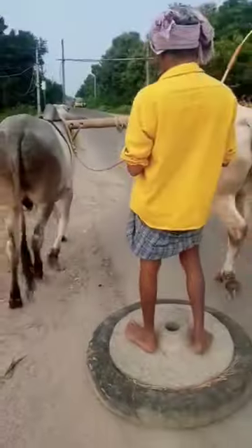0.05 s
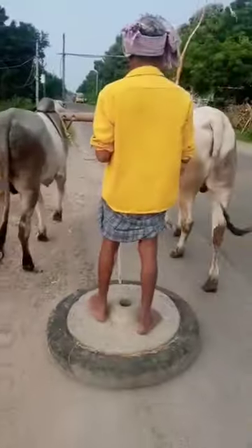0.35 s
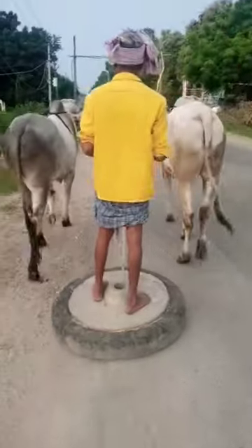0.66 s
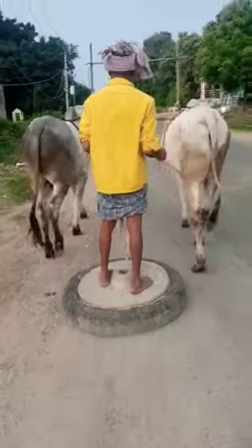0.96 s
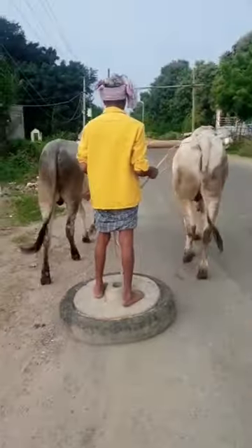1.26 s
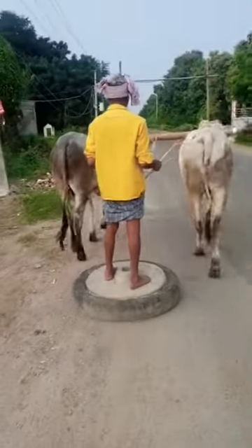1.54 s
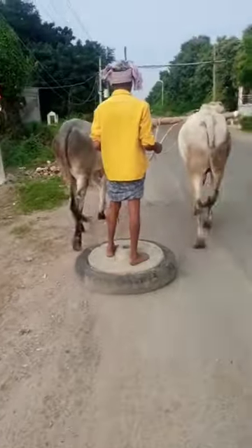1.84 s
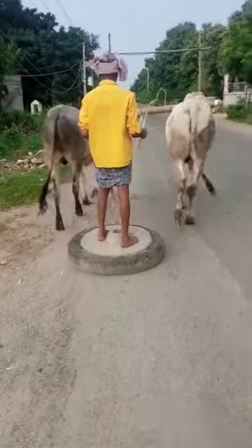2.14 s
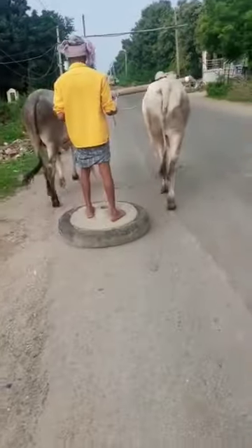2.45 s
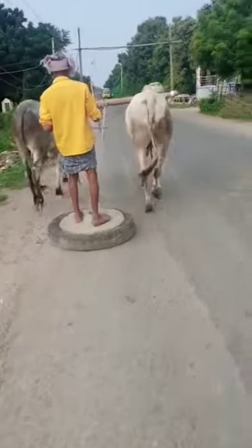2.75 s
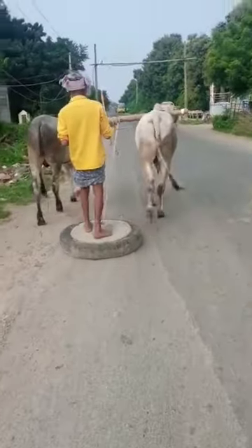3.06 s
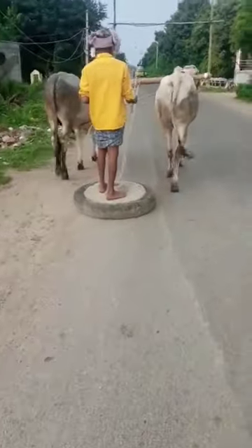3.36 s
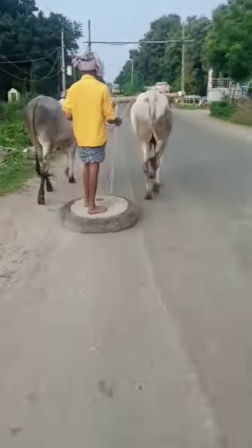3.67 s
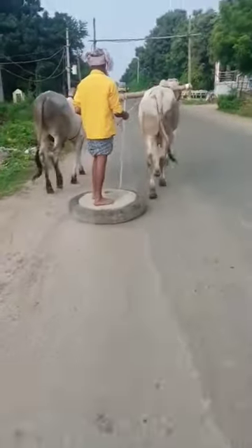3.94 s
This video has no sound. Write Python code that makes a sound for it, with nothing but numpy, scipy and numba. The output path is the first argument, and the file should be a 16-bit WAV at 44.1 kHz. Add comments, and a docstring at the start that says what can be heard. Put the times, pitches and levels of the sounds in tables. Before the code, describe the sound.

A heavy tyre scrapes and rumbles as it is dragged over a gritty road.

```python
"""A dusty verge beside an asphalt road, the microphone a few metres behind a weighted tyre that two oxen
drag, lying flat, onto the road. Bumps make the carcass rumble, the rubber rasps in quick slips, and sand
and small stones crunch and hiss under it. A short reflection that shifts with the walk colours the scrape.
Behind it are faint outdoor air and a single bird chirp."""
import sys
import numpy as np
from scipy import signal
from scipy.fft import rfft, irfft
from scipy.io import wavfile
from scipy.ndimage import uniform_filter1d, map_coordinates
from numba import njit

SR = 44100
rng = np.random.default_rng(int(sys.argv[2]) if len(sys.argv) > 2 else 0)


def unload_wav(signal):
    """Save mono or channel-first audio to the path in sys.argv[1] as 16-bit WAV at rate SR, clipped to [-1, 1]."""
    wavfile.write(
        sys.argv[1],
        SR,
        np.round(np.clip(np.atleast_2d(signal).T, -1, 1) * 32767).astype(np.int16),
    )


N = 176400

# The reflection at the moving microphone. Each row: time in seconds, lag in ms before the hand's sway.
REFLECTION_LAG = [(0, 0.64), (.7, 0.61), (.95, 0.64), (1.12, 0.79), (1.45, 0.77), (1.62, 0.89),
                  (1.85, 1.02), (2.05, 1.04), (2.25, 0.94), (2.95, 0.95), (3.12, 1.077), (3.35, 1.08),
                  (3.52, 0.9), (3.72, 1.02), (4, 1.09)]
# Its strength. Each row: time in seconds, share of the direct sound.
REFLECTION_SHARE = [(0, 0.27), (1.3, 0.36), (2.0, 0.44), (2.4, 0.32), (2.9, 0.06), (3.15, 0.4),
                    (3.42, 0.32), (3.58, 0.26), (4, 0.43)]

# Levels along the walk. Each row: time in seconds, level in dB before the trim below.
RUMBLE_LEVEL = [(0.0, -20), (0.06, -21.5), (0.87, -23.5), (1.3, -23), (1.8, -24.5), (1.86, -29), (1.9, -21),
                (2.0, -25), (2.06, -20.5), (2.15, -24), (2.65, -24), (2.75, -25), (3.75, -25.5), (4.0, -29)]
THUD_LEVEL = [(0.0, -22), (0.05, -24), (0.22, -25), (0.49, -31.5), (1.25, -30), (1.34, -32.5),
              (1.65, -29.5), (1.93, -27.5), (2.0, -36), (2.7, -27.5), (2.86, -32.5), (3.3, -30.5),
              (3.66, -28.5), (3.71, -34), (3.95, -32), (4.0, -38)]
RASP_LEVEL = [(0.0, -26.5), (0.14, -29.5), (1.4, -33), (1.5, -29.5), (1.86, -27.5), (1.88, -30),
              (2.05, -27), (2.08, -31), (2.15, -24), (2.22, -28), (3.02, -27.5), (3.2, -28.5),
              (3.45, -30.3), (3.56, -32), (4.0, -32)]
SAND_LEVEL = [(0.0, -32), (0.75, -30.5), (0.92, -26.5), (0.99, -27.5), (1.32, -33.5), (1.35, -31.5),
              (1.4, -37.5), (1.5, -26.5), (1.72, -30.5), (2.03, -29), (2.1, -31), (2.45, -30.5),
              (2.7, -28.5), (3.0, -28.5), (3.15, -28), (3.43, -31.5), (3.58, -29.5), (3.85, -35.5),
              (3.94, -39.5)]
CRACKLE_LEVEL = [(0.0, -57), (0.35, -47), (0.46, -43.5), (0.56, -48), (0.95, -46.5), (1.05, -53),
                 (1.42, -50), (1.62, -47), (1.77, -57), (2.03, -47), (2.09, -55), (2.2, -45), (2.43, -49),
                 (2.52, -47), (2.95, -49), (3.15, -47), (3.55, -48.5), (3.92, -55), (3.98, -53)]
RUMBLE_TRIM_DB, THUD_TRIM_DB, RASP_TRIM_DB, SAND_TRIM_DB, CRACKLE_TRIM_DB = -0.5, -2, -1, -0.5, 2.5
# Air ringing inside the tyre. Each row: time in seconds, level in dB relative to the carcass.
CAVITY_LEVEL = [(0, -21), (.3, -3), (.8, -12), (1.2, -2), (1.9, -5), (2.55, -3), (2.8, -6.5), (3.2, -23),
                (3.7, -3), (4, -3.5)]

# Tone colours of tyre and ground. Each row: frequency in Hz, relative level in dB.
CARCASS_COLOUR = [(40, -42), (80, -13.5), (115, -3), (150, 0), (240, -3), (340, -5), (450, -12.5),
                  (600, -21.5), (1200, -59.5)]
THUD_COLOUR = [(20, -32), (38, -18), (50, -23.5), (66, 4), (85, 5.5), (105, -4), (140, -12.5), (300, -49.5)]
RUBBER_ON_DUST = [(150, -31), (400, 5), (620, 10.5), (830, -3), (1080, 2.5), (1300, -11), (1900, -2.5),
                  (2400, -11.5), (2800, -10), (3500, -9.5), (4200, -16), (8000, -55)]
RUBBER_ON_ASPHALT = [(150, -15.5), (420, 4), (570, -7), (700, 3.5), (950, 0), (1180, -8), (1450, 1.5),
                     (1720, -14.5), (2200, -3), (2750, -11.5), (4000, -12), (8000, -39.5)]
GRIT_COLOUR = [(1000, -5.5), (2800, -7.5), (3600, -14), (4400, -5.5), (4850, -7), (5550, -3), (6000, 2),
               (6900, -6), (7250, -5), (7900, -22), (9000, -31), (16000, -44)]
CRACKLE_COLOUR = [(4000, -28), (8000, -5.5), (10000, -5.5), (12300, -5.5), (13700, -8), (14900, 6),
                  (15700, 0.5), (17000, 0)]
STONE_COLOUR = [(300, -13), (1500, 0), (3500, -3), (6500, -7), (8000, -24), (16000, -30)]
PEBBLE_COLOUR = [(2000, -21), (4000, -10.5), (4500, -4), (5400, -6), (6200, 0), (7000, 2), (7700, -20),
                 (9000, -33), (16000, -28)]

# Resonances of grinding sand and rubber. Each row: time in seconds, centre in Hz, relative level in dB.
SAND_RING_LOW = [(0, 3300, -16), (.3, 3540, -5), (.7, 3460, -4.5), (.95, 3400, -29), (1.3, 3340, -1.5),
                 (1.65, 3410, -16.5), (4, 3450, -33)]
SAND_RING_MID = [(0, 5240, 1), (.35, 5130, -4), (.9, 5000, -7), (1.15, 5230, -7), (1.45, 5440, -6),
                 (1.65, 4950, -15), (2.02, 4700, -6.5), (2.2, 4800, -13), (3.02, 4900, -13),
                 (3.1, 4760, -9), (3.44, 4860, -6), (3.52, 5050, -19), (4, 5200, 2)]
SAND_RING_TOP = [(0, 6520, -2.5), (.7, 6320, -1.5), (.9, 6400, -7.5), (1.08, 6600, -3), (1.38, 6400, 4.5),
                 (1.6, 6420, -9.5), (2.02, 6500, 2), (2.35, 6690, -3), (2.8, 6480, 0.5), (3.2, 6540, 0.5),
                 (3.58, 6720, -0.5), (3.8, 6780, 0.5), (4, 7000, 4)]
RASP_RING = [(0, 1640, -3.5), (.9, 1635, -4), (1.3, 1610, -1.5), (1.55, 1550, -3), (1.9, 1310, -24),
             (2.25, 1420, -5.5), (2.92, 1490, -8), (3.06, 1590, -10), (3.16, 1830, -4), (3.35, 1740, -21),
             (3.55, 1450, -10), (4, 1360, -4.5)]

# Small stones under the rubber. Each row: start in seconds, level in dB.
STONE_CRACKS = [(0.331, -25), (0.647, -24), (0.838, -26), (1.157, -27), (1.322, -26), (3.481, -31)]
# Sand crushed under the rim. Each row: start in seconds, time held in seconds, level in dB.
SAND_SPURTS = [(0.826, 0.06, -33), (0.903, 0.045, -32), (1.207, 0.029, -32), (2.729, 0.0098, -29),
               (2.773, 0.014, -40), (3.128, 0.015, -38), (3.256, 0.007, -30), (3.518, 0.011, -29),
               (3.63, .008, -48)]
# Groans of gripping rubber. Each row: start in seconds, length in seconds, centre in Hz, level in dB.
RUBBER_GRIPS = [(2.82, .16, 1460, -27.5), (2.995, 0.058, 820, -25), (3.4, 0.063, 1840, -32.5),
                (3.1, 0.2, 840, -32), (3.3, 0.23, 900, -33)]
# Jolts over the road. Each row: start in seconds, pitch in Hz, level in dB before the trim.
ROAD_BUMPS = [(0.052, 172, -28), (0.064, 98.4, -25), (0.538, 193, -16.5), (0.94, 199, -21),
              (1.015, 95.7, -18), (1.166, 201.5, -24), (1.282, 81.4, -25), (1.545, 97.2, -25),
              (1.631, 94.8, -27), (1.682, 178, -21), (1.717, 90, -36), (1.751, 169, -26),
              (1.88, 188.5, -20), (2.054, 182.6, -16), (2.159, 106.1, -19.5), (2.293, 174.5, -18.5),
              (2.378, 101.6, -19), (2.499, 207.3, -16), (2.619, 196, -16.5), (2.944, 204.4, -17.5),
              (3.52, 84, -20), (3.597, 191, -20.5), (3.724, 194.4, -22)]


def undb(db):
    """Decibels to gain."""
    return 10 ** (np.asarray(db) / 20)


def unit(x):
    """Scale to rms 1."""
    return x / np.sqrt(np.mean(x ** 2) + 1e-18)


def curve(rows, column=1):
    """One column of a table, joined by straight lines in time."""
    rows = np.array(rows, float)
    return np.interp(np.arange(N) / SR, rows[:, 0], rows[:, column])


def colour(x, points):
    """Causal filter through (Hz, dB) points; rms 1."""
    hz, db = np.array(points, float).T
    bins_hz = np.maximum(np.arange(N // 2 + 1) * SR / N, 1)
    gain = undb(np.interp(np.log(bins_hz), np.log(hz), db))
    cepstrum = irfft(np.log(gain), N)
    cepstrum[1:N // 2] *= 2  # fold to minimum phase
    cepstrum[N // 2 + 1:] = 0
    return unit(irfft(rfft(x) * np.exp(rfft(cepstrum)), N))


@njit
def bandpass(x, hz, width_hz):
    """State-variable band-pass whose centre may move."""
    out, band_state, low_state = np.empty(len(x)), 0., 0.
    for i in range(len(x)):
        tuning, damping = np.tan(np.pi * hz[i] / SR), width_hz / hz[i]
        band = (band_state + tuning * (x[i] - low_state)) / (1 + tuning * (tuning + damping))
        band_state, low_state = 2 * band - band_state, low_state + 2 * tuning * band
        out[i] = damping * band
    return out


def ring(x, hz, width_hz):
    """A resonance, its skirts steepened by a second, wider band-pass; rms 1."""
    hz = hz * np.ones(N)
    return unit(bandpass(bandpass(x, hz, float(width_hz)), hz, 4. * width_hz))


def wander(per_s):
    """Smooth random motion through per_s values a second; rms 1."""
    knots = rng.standard_normal(N // 20)
    return unit(map_coordinates(knots, [np.arange(N) / SR * per_s], order=2, mode="mirror"))


def grains(per_s, spread_db):
    """Randomly timed contacts of scattered size and sign; rms 1."""
    hit = rng.random(N) < per_s / SR
    size = np.clip(rng.standard_normal(N), -2, 2)
    return unit(hit * np.sign(rng.standard_normal(N)) * undb(spread_db * size))


def outdoor_air(level_db=-57):
    """A faint, steady bed of open-air noise."""
    return undb(level_db) * colour(rng.standard_normal(N), [(20, -13), (80, -16), (1000, 5), (16000, -28)])


def bird(start_s=0.645, length_s=0.042, from_hz=4460, fall_hz=800, level_db=-31):
    """One short falling chirp, slightly rough in pitch."""
    progress = np.clip((np.arange(N) / SR - start_s) / length_s, 0, 1)
    hz = (from_hz - fall_hz * progress ** 2) * (1 + 0.018 * wander(per_s=700))
    return undb(level_db) * np.sin(np.pi * progress) * np.sin(2 * np.pi * np.cumsum(hz) / SR)


def reflection(direct, hand_sway=0.019):
    """A copy about a millisecond late; the lag shifts with the walk and the hand holding the microphone."""
    lag_ms = curve(REFLECTION_LAG) * (1 + hand_sway * wander(per_s=14))
    late = map_coordinates(direct, [np.arange(N) - lag_ms * SR / 1000], order=1, mode="mirror")
    return curve(REFLECTION_SHARE) * late


def stones(decay_s=0.0073):
    """Small stones crack dully under the rubber."""
    t = np.arange(N) / SR
    envelope = sum(undb(db) * (t >= start) * np.exp(-np.maximum(t - start, 0) / decay_s)
                   for start, db in STONE_CRACKS)
    return envelope * colour(grains(per_s=9000, spread_db=4.5), STONE_COLOUR)


def burst(start_s, hold_s, rise_s, decay_s):
    """An envelope that ramps up, holds until hold_s after its start, then dies away."""
    age = np.arange(N) / SR - start_s
    return np.clip(age / rise_s, 0, 1) * np.exp(-np.maximum(age - hold_s, 0) / decay_s)


def pebble(judder, level_db=-25):
    """A trapped pebble skids across the asphalt with a sharp, bright scrape."""
    envelope = burst(start_s=3.958, hold_s=0.028, rise_s=0.005, decay_s=0.0085)
    contacts = grains(per_s=10000, spread_db=2) * undb(1.2 * judder)
    return undb(level_db) * envelope * colour(contacts, PEBBLE_COLOUR)


def crunch(pressure):
    """Sand grains crack in clusters and excite three bright, wandering resonances; rms 1."""
    out = colour(grains(per_s=12000, spread_db=-1.5) * pressure, GRIT_COLOUR)
    for table, width_hz in (SAND_RING_LOW, 210), (SAND_RING_MID, 300), (SAND_RING_TOP, 400):
        hz = curve(table) * (1 + 0.011 * wander(per_s=25))
        cracks = grains(per_s=7100, spread_db=4.0) * pressure
        out += undb(curve(table, column=2)) * ring(cracks, hz, width_hz)
    return unit(out)


def sand(judder, yield_limit=1.5):
    """Sand grinds under the tyre: a running hiss, fine crackle and short spurts under the rim."""
    hiss = crunch(undb(2.0 * judder)) * undb(curve(SAND_LEVEL) + SAND_TRIM_DB)
    fine_grains = grains(per_s=3500, spread_db=3.0) * undb(2.8 * judder)
    crackle = colour(fine_grains, CRACKLE_COLOUR) * undb(curve(CRACKLE_LEVEL) + CRACKLE_TRIM_DB)
    spurts = sum(undb(db) * burst(start, hold, rise_s=0.00096, decay_s=0.017)
                 for start, hold, db in SAND_SPURTS)
    rim_pressure = undb(3.7 * np.minimum(judder, yield_limit))  # above the limit the sand gives way
    return hiss + crackle + spurts * crunch(rim_pressure)


def grips():
    """The rubber grips and groans briefly in a narrow band."""
    t = np.arange(N) / SR
    out = np.zeros(N)
    for start, length, hz, db in RUBBER_GRIPS:
        swell = np.sin(np.pi * np.clip((t - start) / length, 0, 1))
        out += undb(db) * swell * ring(grains(per_s=1200, spread_db=-3.0), hz, width_hz=190)
    return out


def rasp(judder, verge_ends_s=0.91, asphalt_from_s=1.52, dust_db=4.5, asphalt_db=0.5):
    """Rubber sticks and slips; its colour changes as dust gives way to asphalt."""
    def slips():
        return grains(per_s=6000, spread_db=2.5) * undb(1.7 * judder)
    paved = curve([(verge_ends_s, 0), (asphalt_from_s, 1)])
    dust = np.sqrt(1 - paved) * undb(dust_db) * colour(slips(), RUBBER_ON_DUST)
    road = np.sqrt(paved) * undb(asphalt_db) * colour(slips(), RUBBER_ON_ASPHALT)
    resonance = undb(curve(RASP_RING, column=2)) * ring(slips(), curve(RASP_RING), width_hz=246)
    return (dust + road + resonance) * undb(curve(RASP_LEVEL) + RASP_TRIM_DB)


def bumps(rise_s=0.013, waver=0.1233, trim_db=-2):
    """The tyre jolts over each bump: a quick swell and a dying boom whose pitch is unsteady."""
    t = np.arange(N) / SR
    out = np.zeros(N)
    for start, hz, db in ROAD_BUMPS:
        age = np.maximum(t - start, 0) / rise_s
        cycles = np.cumsum(hz * (1 + waver * wander(per_s=120))) / SR
        out += undb(db + trim_db) * age * np.exp(1 - age) * np.sin(2 * np.pi * cycles)
    return out


def even_level(shaking):
    """Gently compresses the low rumble so its loudness stays steady; rms 1."""
    power = uniform_filter1d(shaking ** 2, size=3000)
    return unit(shaking / (power + 1e-6) ** 0.28)


def rumble():
    """The rough road thuds, shakes the carcass and rings the air inside the tyre."""
    cavity = undb(curve(CAVITY_LEVEL)) * ring(grains(per_s=900, spread_db=1.0), hz=190, width_hz=33)
    carcass = colour(grains(per_s=1500, spread_db=2), CARCASS_COLOUR)
    thud = colour(grains(per_s=770, spread_db=3.0), THUD_COLOUR)
    body = even_level(carcass + cavity) * undb(curve(RUMBLE_LEVEL) + RUMBLE_TRIM_DB)
    return body + even_level(thud) * undb(curve(THUD_LEVEL) + THUD_TRIM_DB)


def scene(judder_per_s=260, lurch_per_s=42):
    """Mono, from a few metres behind: the juddering tyre and its reflection over the bird and the air."""
    judder = unit(wander(judder_per_s) + 0.42 * wander(lurch_per_s))
    low_end = rumble() + bumps()
    rubber_judder = unit(0.42 * judder + wander(judder_per_s))  # partly follows the tyre's judder
    tyre = low_end + rasp(rubber_judder) + grips() + sand(judder) + pebble(judder) + stones()
    return (tyre + reflection(tyre) + outdoor_air() + bird())[None]


def record(dry, low_cut_hz=41.7, top_hz=15800):
    """The recorder rounds the peaks, thins the lowest bass and cuts the top."""
    rounded = np.tanh(1.5 * dry) / 1.5
    thinned = signal.sosfilt(signal.butter(2, low_cut_hz, "high", fs=SR, output="sos"), rounded)
    return signal.sosfilt(signal.ellip(10, .2, 80, top_hz, fs=SR, output="sos"), thinned)


dry = scene()
out = record(dry)
unload_wav(out)
```